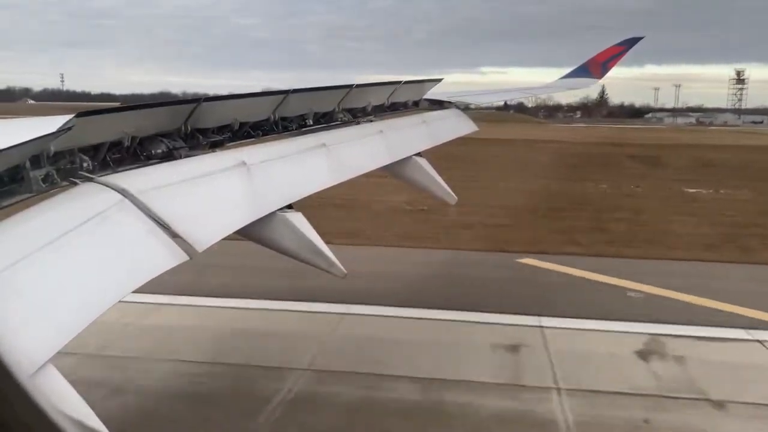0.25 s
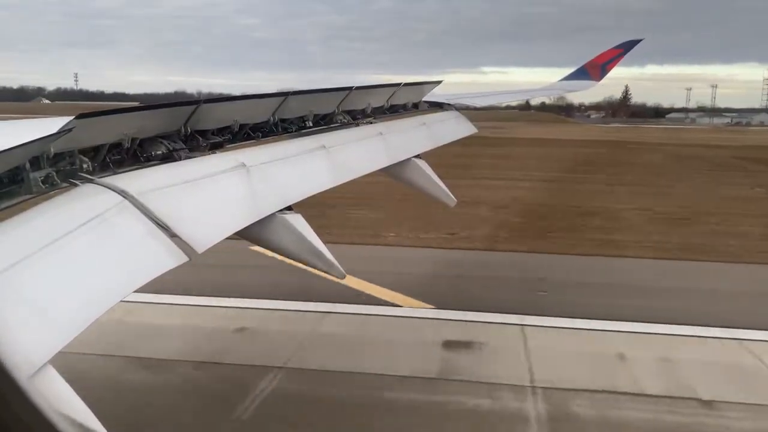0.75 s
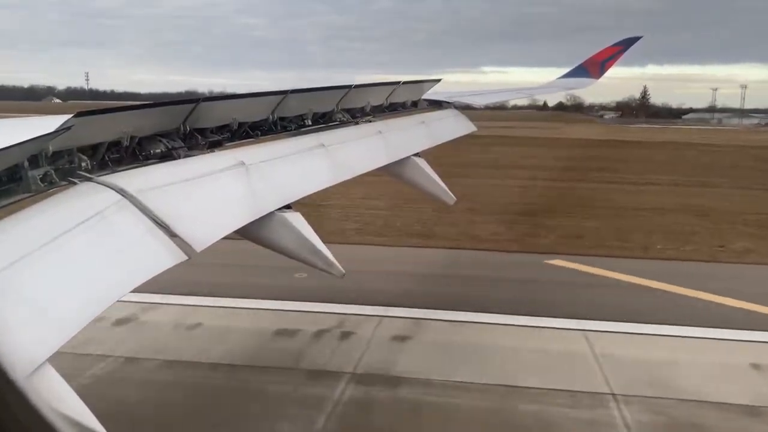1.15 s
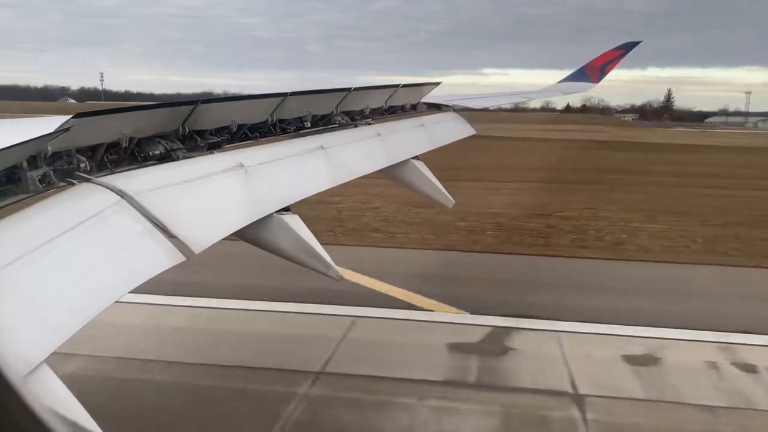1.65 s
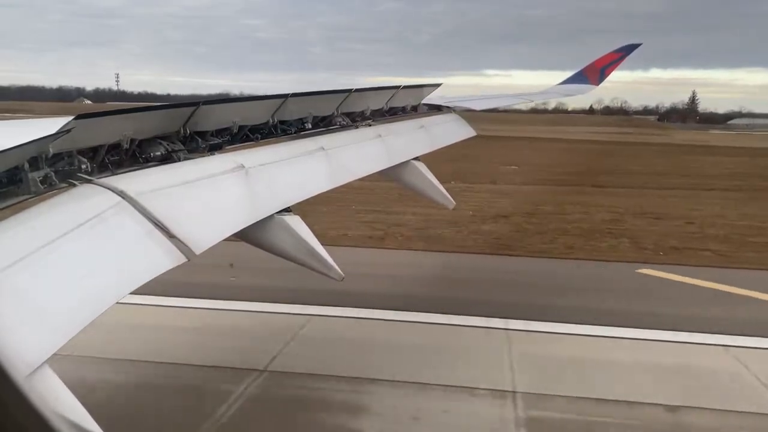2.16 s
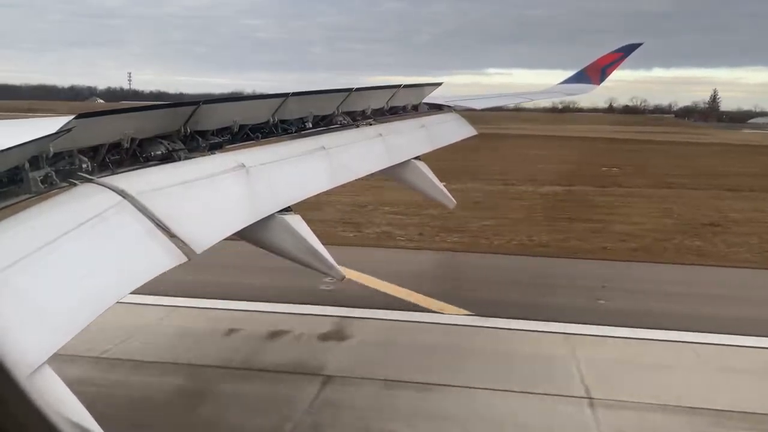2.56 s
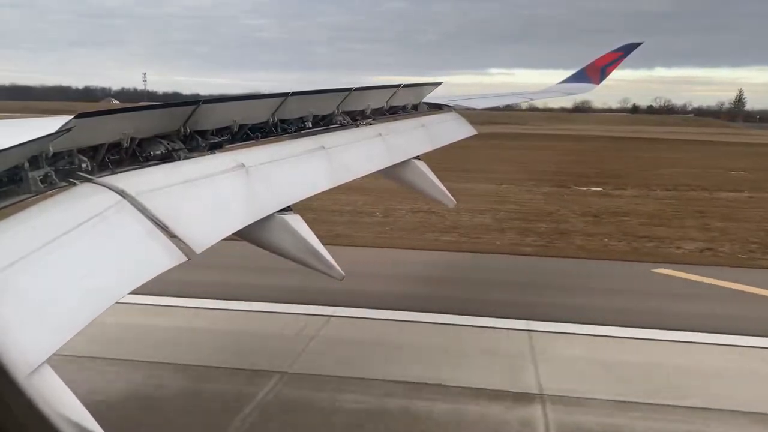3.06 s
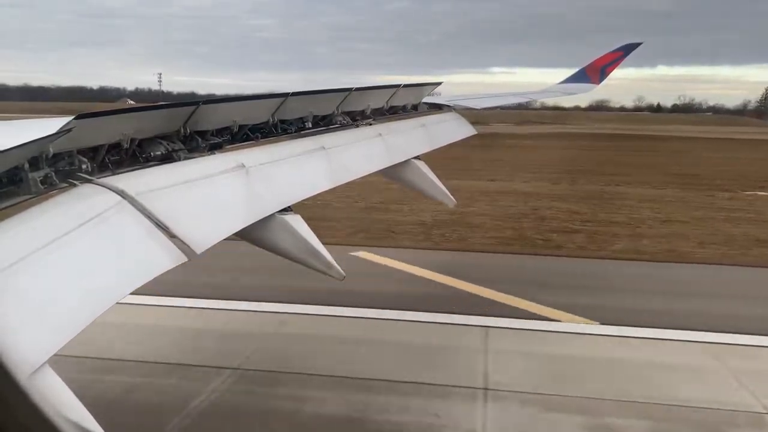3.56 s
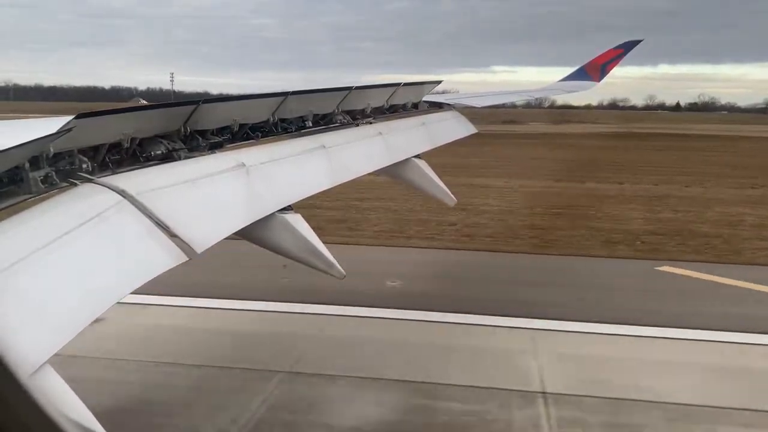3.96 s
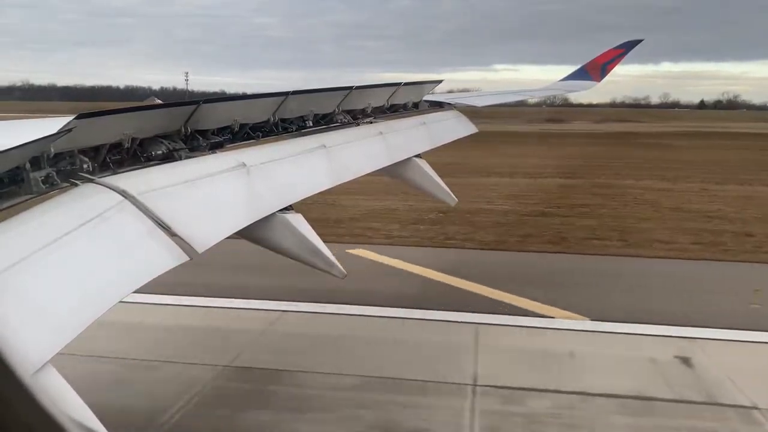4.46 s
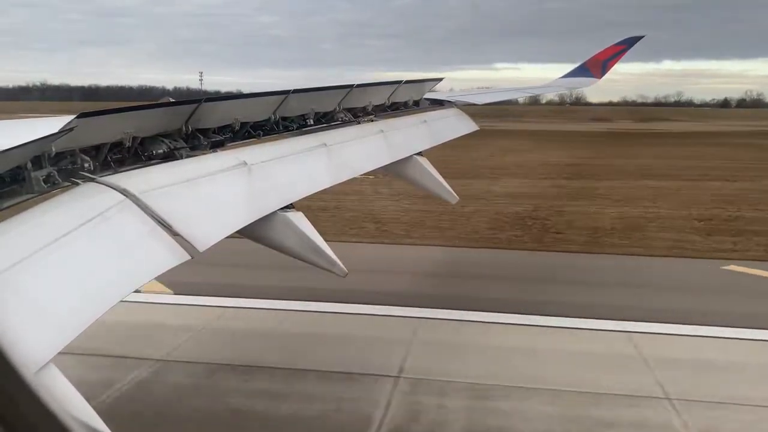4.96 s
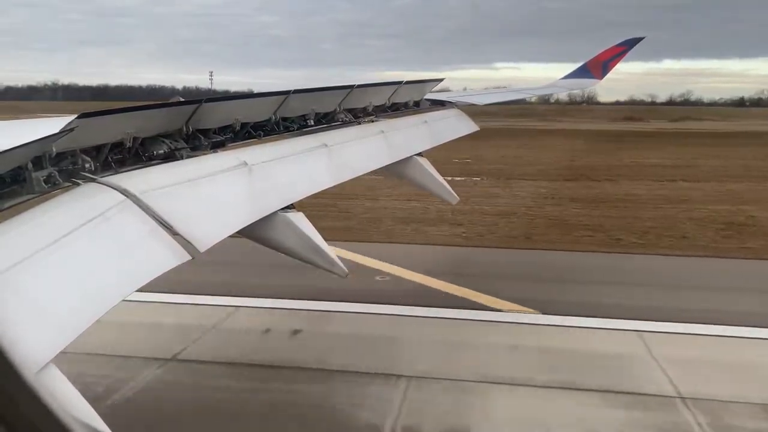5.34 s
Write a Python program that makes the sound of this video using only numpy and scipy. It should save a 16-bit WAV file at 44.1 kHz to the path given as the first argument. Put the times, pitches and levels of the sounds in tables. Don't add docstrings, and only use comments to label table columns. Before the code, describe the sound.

A loud, boomy roar through an aircraft wall drops off after a second and a half, while low wheel rumble continues unevenly underneath. Dry panel knocks come in a dense burst, then scattered raps, hollow latch ticks, tiny buckle clinks and thin plastic chirps. A lower squeak sounds near the end. Small, dry cabin, handheld stereo microphone at the seat.

```python
import sys
import numpy as np
from scipy import signal
from scipy.fft import rfft, irfft, next_fast_len
from scipy.io import wavfile
from scipy.ndimage import uniform_filter1d, map_coordinates

SR = 44100
rng = np.random.default_rng(int(sys.argv[2]) if len(sys.argv) > 2 else 0)


def gain_from_decibels(decibels):
    exponent = np.asarray(decibels, float) / 20
    return 10 ** exponent


def to_wav(sig):
    pcm = np.clip(np.atleast_2d(sig), -1, 1) * 32767
    pcm = np.round(pcm).astype(np.int16)
    wavfile.write(sys.argv[1], SR, pcm.T)


N = 246959


def unit(x):
    return x / np.sqrt(np.mean(x ** 2) + 1e-20)


def along(points, hz):
    f, v = np.transpose(points)
    return np.interp(np.log(hz + 1), np.log(f + 1), v)


def curves(rows):
    s, *cols = np.transpose(rows)
    return [np.interp(np.arange(N) / SR, s, c) for c in cols]


def wobble(rate_hz):
    knots = rng.standard_normal(int(N * rate_hz / SR) + 4)
    return map_coordinates(knots, [np.arange(N) * rate_hz / SR])


def filtered(x, response):
    n = x.shape[-1]
    m = next_fast_len(n + 8192)
    return irfft(rfft(x, m) * response(np.fft.rfftfreq(m, 1 / SR)), m)[..., :n]


def rush(spectrum, patchy_db):
    z = signal.stft(rng.standard_normal((2, N)), nperseg=512)[2]
    field = uniform_filter1d(rng.standard_normal(z.shape[1:]), size=6, axis=0)
    field = uniform_filter1d(field, size=12, axis=1)
    pair = signal.istft(z * gain_from_decibels(patchy_db * unit(field)), nperseg=512)[1][:, :N]
    return unit(filtered(pair, lambda hz: gain_from_decibels(along(spectrum, hz))))


def evened(x, share):
    envelope = np.abs(signal.hilbert(x[0], next_fast_len(N))[:N])
    swell = uniform_filter1d(envelope, size=900)
    return unit(x / (swell + 0.51) ** share)


def fuzzy(hz, width_hz, steady):
    phase = 2 * np.pi * np.cumsum(hz) / SR
    pair = []
    for clean in (steady, 0):
        in_phase = (clean + wobble(width_hz)) * np.cos(phase)
        pair.append(in_phase + wobble(width_hz) * np.sin(phase))
    return unit(np.array(pair))


def add(track, s, sound):
    part = track[round(s * SR):][:len(sound)]
    part += sound[:len(part)]


def scattered(x, wet_db, t60_s):
    t = np.arange(SR // 5) / SR
    tails = rng.standard_normal((2, len(t))) * gain_from_decibels(-60 * t / t60_s)
    wet = signal.fftconvolve(x[None], tails / np.linalg.norm(tails[0]), axes=1)[:, :N]
    return x * np.array([[1], [-.3]]) + gain_from_decibels(wet_db) * wet


def faint(db):
    count, spread_db = 90, 5.5
    rows = rng.random((count, 2))
    return [(u * N / SR, db + spread_db * (2 * v - 1)) for u, v in rows]


def shaking():
    # start_s, length_s, shaking_db, extra_for_clips_db
    patches = [(0.106, 0.6, 4, -2.5), (1.102, 0.029, 2, -0.5), (1.169, 0.029, -1, 12),
               (1.282, 0.054, 0.5, 3), (1.454, 0.055, 6, 4), (1.528, 0.016, 8.5, -10), (1.579, 0.024, 4, 1),
               (1.602, 0.27, 11.5, 1.5), (1.654, 0.34, 4.5, -2), (1.97, 0.18, 5.5, -1.5),
               (2.325, 0.038, 6.5, -1), (2.46, 0.11, 4, 1), (2.907, 0.043, 3, 0.5), (3.178, 0.11, -2, 6),
               (3.305, 0.1, -4, -1), (3.492, 0.02, 7, -0.5), (3.677, 0.16, 3.5, -0.5),
               (4.295, 0.068, 3, -1.5), (4.363, .035, 4.5, 3), (4.424, 0.093, 1.5, -0.5), (4.49, 0.1, 6, 0),
               (4.608, 0.12, 5.5, 0), (4.796, 0.032, 2.5, 0.5), (4.987, 0.022, 0, 1.5), (5.253, 0.13, 3, 0),
               (5.528, 0.019, 9, -0.5)]
    rise_s, fall_s = 0.0036, 0.023
    t = np.arange(N) / SR
    start_s, length_s, db, clip_db = np.transpose(patches)[:, :, None]
    rise = np.clip((t - start_s) / rise_s, 0, 1)
    on = rise * np.exp(-np.clip(t - start_s - length_s, 0, None) / fall_s)
    return (on * db).sum(axis=0), (on * (db + clip_db)).sum(axis=0)


def level(shake_db, idle_db, per_thrust, per_shake):
    # time_s, level_db
    thrust = [
        (0, -21.5),
        (.6, -23),
        (1.2, -23),
        (1.5, -27),
        (2.05, -28.5),
        (2.3, -30.5),
        (3, -32),
        (4, -33.5),
        (5.6, -34),
    ]
    thrust_over_idle_db = curves(thrust)[0] + 33
    return gain_from_decibels(idle_db + per_thrust * thrust_over_idle_db + per_shake * shake_db)


def engines():
    # time_s, level_db
    whine = [(1.2, -60), (1.7, -52), (2.15, -57), (2.28, -46.5), (2.7, -49), (2.9, -47), (3.35, -51),
             (3.6, -48), (4.24, -52), (4.31, -43.5), (4.47, -54), (4.57, -44.5), (4.82, -43), (5, -53),
             (5.26, -52), (5.38, -46), (5.55, -50)]
    # pitch_hz, level_db, width_hz, fade_end_s
    pumps = [
        (1254, -47.5, 24, 1.9),
        (1593, -58, 30, 1.7),
        (12000, -80.5, 260, 1.7),
    ]
    whine_from_s, whine_hz, sag_hz_per_s = 1.2, 940, 19
    waver_hz, break_db = 6, 1.2
    t = np.arange(N) / SR
    hz = whine_hz - sag_hz_per_s * (t - whine_from_s) + waver_hz * wobble(5)
    whine_gain = gain_from_decibels(curves(whine)[0] + break_db * wobble(9)) * (t > whine_from_s)
    sound = whine_gain * fuzzy(hz, 55, steady=1.9)
    for pump_hz, pump_db, width_hz, until_s in pumps:
        fade = np.clip((until_s - t) / 0.35, .25, 1)
        sound += gain_from_decibels(pump_db) * fade * fuzzy(np.full(N, pump_hz), width_hz, steady=0.27)
    return sound


def squeaks():
    # start_s, peak_db, start_hz, end_hz, length_s
    chirps = [(0.361, -53.5, 9200, 9800, .01), (0.368, -56.5, 11300, 11350, .014),
              (0.373, -53, 8550, 8950, 0.015), (0.515, -54.5, 8700, 11100, 0.018),
              (0.687, -48, 8570, 9340, 0.01), (0.695, -53, 10400, 10800, 0.018),
              (1.092, -62.5, 11400, 11660, 0.013), (1.32, -54, 10840, 11100, 0.015),
              (1.555, -55.5, 11300, 11200, 0.023), (2.224, -51, 11000, 8800, 0.0089),
              (2.232, -43, 9140, 8870, 0.0092), (2.524, -50, 9200, 11000, 0.0063),
              (2.531, -52.5, 8730, 8800, 0.0096), (2.698, -50.5, 8700, 10800, 0.01),
              (2.753, -53.5, 10740, 11200, .022), (2.956, -53, 9200, 11100, 0.012),
              (3.257, -60, 10100, 11000, 0.014), (3.493, -58, 11000, 11000, .012),
              (3.686, -55.5, 11100, 10850, 0.013), (3.904, -47, 3800, 3850, 0.035),
              (4.395, -59.5, 9000, 10800, .014), (4.816, -36, 1570, 1600, 0.06),
              (4.856, -39.5, 1590, 1585, 0.064), (5.423, -55, 9950, 11000, 0.013)]
    track = np.zeros(N)
    stumble_hz = 220 * wobble(900)
    for s, db, start_hz, end_hz, length_s in chirps:
        u = np.linspace(0, 1, int(np.clip(length_s, .004, .13) * SR))
        roughness = abs(end_hz - start_hz) / 900 + start_hz / 33000
        hz = start_hz + (end_hz - start_hz) * u + stumble_hz[round(s * SR):][:len(u)] * roughness
        chirp = np.sin(np.pi * u ** 0.44) * np.sin(2 * np.pi * np.cumsum(hz) / SR)
        add(track, s, gain_from_decibels(db - 4.0) * chirp)
        grain = 5 * uniform_filter1d(rng.standard_normal(len(u)), size=10)
        tick = grain * np.sin(2 * np.pi * 9600 * np.arange(len(u)) / SR)
        add(track, s, gain_from_decibels(db - 9 - 40 * u) * tick * (start_hz > 8000))
    return scattered(track * gain_from_decibels(3.5 * wobble(500)), wet_db=-3, t60_s=.045)


def rattles():
    # start_s, peak_db, ring_hz
    knocks = [(0.196, -34, 3430), (0.745, -26.5, 3220), (1.272, -30.5, 2530), (1.4524, -38, 3250),
              (1.4523, -35.5, 5070), (1.528, -31, 4380), (1.532, -27, 3150), (1.594, -24.5, 3260),
              (1.641, -22, 4300), (1.645, -28, 3980), (1.657, -36, 2400), (1.685, -29, 1630),
              (1.7, -33.5, 4400), (1.708, -28, 4950), (1.717, -31, 2450), (1.743, -27.5, 2450),
              (1.768, -28.5, 5060), (1.775, -28, 3220), (1.797, -20.5, 2500), (1.8084, -21.5, 4300),
              (1.81, -26.5, 5200), (1.867, -30, 4370), (1.873, -24, 2280), (2.03, -38, 2830),
              (2.183, -38.5, 3000), (2.292, -31, 3160), (2.3417, -34, 2850), (2.5084, -23, 2270),
              (2.5632, -24, 2500), (2.654, -32, 1890), (2.6873, -32, 3110), (2.931, -34, 2790),
              (3.219, -34, 900), (3.493, -30.5, 2580), (3.564, -34, 2500), (3.686, -30, 2410),
              (3.753, -25, 3320), (3.812, -33.5, 2880), (4.297, -30, 2550), (4.301, -33, 1000),
              (4.375, -35, 4380), (4.544, -30, 1840), (4.549, -36, 2600), (4.685, -30, 1060),
              (4.7, -32, 2250), (4.82, -32.5, 2250), (4.854, -45, 3000), (5.208, -30, 950),
              (5.26, -36.5, 2850), (5.2784, -29.5, 2900), (5.3297, -32.5, 2570), (5.399, -34, 3040),
              (5.43, -42.5, 5400), (5.486, -40, 3000), (5.528, -38.5, 2730), (5.546, -29, 2250)]
    # freq_hz, level_db
    panel = [(400, -57.5), (1200, -5), (2500, 10.5), (4000, 4), (5500, -3), (6500, -13), (9000, -21),
             (15500, -34.5)]
    # start_s, peak_db
    ticks = [(1.976, -25.5), (2.034, -37), (2.0789, -43), (2.1844, -41), (2.5062, -30), (2.544, -45),
             (2.685, -24), (2.8713, -26), (3.131, -45), (3.4617, -27.5), (3.5007, -29.5), (3.567, -32),
             (3.6349, -40), (3.685, -26), (3.939, -24), (4.007, -27.5), (4.1856, -59), (4.245, -24),
             (4.302, -32), (4.374, -27), (4.436, -44), (4.4947, -27.5), (4.526, -38), (4.551, -31),
             (4.62, -37), (4.6715, -27), (4.75, -26), (4.945, -41.5), (5.016, -36), (5.165, -40.5),
             (5.2155, -33), (5.26, -33.5), (5.332, -23), (5.3995, -25), (5.5384, -35)]
    # start_s, peak_db
    clinks = [(0.243, -52.5), (0.382, -61), (0.4942, -62), (0.687, -65), (0.732, -56), (0.8216, -59),
              (1.1955, -55.5), (1.2712, -57.5), (1.46, -61.5), (1.6075, -60.5), (1.741, -51), (1.7762, -48),
              (2.2174, -58.5), (2.288, -53), (2.4454, -56), (2.4833, -67), (2.5324, -71), (2.663, -61),
              (2.81, -60), (2.973, -63.5), (3.685, -58), (3.727, -62), (3.753, -56.5), (4.2992, -71),
              (4.3585, -60), (4.5284, -64), (4.9552, -69), (4.9951, -61), (5.3317, -52.5), (5.527, -58.5)]
    tick_hz, clink_hz = 1515, 8200
    crack_db, crack_t60_s, echo_db, echo_t60_s = -5, .003, -18, .035
    cracks, rings = np.zeros((N, 2)), np.zeros(N)
    t = np.arange(SR // 16) / SR
    for s, db, hz in knocks:
        dull_db = 8 * (hz < 1200)
        snap = gain_from_decibels(crack_db - 60 * t / crack_t60_s) * rng.standard_normal(len(t)) * np.array([[1], [-.3]])
        echo = gain_from_decibels(echo_db - 60 * t / echo_t60_s) * rng.standard_normal((2, len(t)))
        add(cracks, s, gain_from_decibels(db - dull_db) * (snap + echo).T)
        add(rings, s, gain_from_decibels(db + dull_db - 7.5 - 60 * t / .018) * np.sin(2 * np.pi * hz * t))
    for s, db in ticks + faint(-44):
        dying = gain_from_decibels(-60 * t / .022) * (1 - np.exp(-t / .0015))
        add(rings, s, gain_from_decibels(db + 4) * dying * np.sin(2 * np.pi * tick_hz * rng.normal(1, .008) * t))
    for s, db in clinks + faint(-68.5):
        hz = clink_hz * rng.normal(1, .008)
        add(rings, s, gain_from_decibels(db + 5.5 - 60 * t / 0.012) * np.sin(2 * np.pi * hz * t))
    for s, db in faint(-43) + faint(-43):
        hz = rng.uniform(2000, 4000)
        add(rings, s, gain_from_decibels(db - 60 * t / .02) * np.sin(2 * np.pi * hz * t))
    cracks = filtered(cracks.T, lambda hz: gain_from_decibels(along(panel, hz)))
    return cracks + scattered(rings, wet_db=-9, t60_s=.05)


def trim():
    # freq_hz, level_db_per_hz
    chatter = [(200, -120), (500, -31), (900, 2.5), (1500, -1), (2500, -4.5), (4300, -12), (5500, -14),
               (6200, -25.5), (9000, -120)]
    # freq_hz, level_db_per_hz
    buzz = [(3000, -120), (5500, -10.5), (6500, 1.5), (7500, -4.5), (8300, -2), (9300, -7.5),
            (11000, -13.5), (15500, -18)]
    panel_db, clip_db = shaking()
    contacts = gain_from_decibels(2.6 * wobble(260) + .7 * wobble(60))
    crackle = gain_from_decibels((.6 + .035 * panel_db) * wobble(70))
    panels = unit(contacts * rush(chatter, patchy_db=0.3))
    clips = unit(contacts * rush(buzz, patchy_db=-1.0))
    panels *= level(panel_db, idle_db=-51, per_thrust=0.092, per_shake=0.88)
    clips *= level(clip_db, idle_db=-67.5, per_thrust=0.15, per_shake=0.9)
    return crackle * (panels + clips)


def jolt():
    peak_db, hz, t60_s = -3, 105, .05
    t = np.arange(N) / SR
    return -gain_from_decibels(peak_db - 60 * t / t60_s) * np.cos(2 * np.pi * hz * t) * np.array([[1], [0]])


def rollout():
    # freq_hz, level_db_per_hz
    tyre_spectrum = [(5, -61.5), (22, -6.5), (40, 2.5), (60, 9.5), (82, 10), (105, 7.5), (140, -14),
                     (220, -64.5), (500, -120)]
    boom_spectrum = [(25, -120), (60, -47.5), (90, -9.5), (120, 2), (150, -2), (180, -6.5), (210, -6.5),
                     (250, -31), (330, -49.5), (700, -120)]
    wall_spectrum = [(60, -120), (150, -34.5), (230, -3), (290, 1), (330, -3.5), (380, -0.5), (450, -11),
                     (550, -15.5), (750, -16.5), (1100, -49.5), (2500, -120)]
    upper_spectrum = [(200, -120), (500, -22.5), (750, 0), (950, 0.5), (1150, -4), (1400, -7), (1600, -3.5),
                      (1900, -13), (2600, -66), (6000, -120)]
    hiss_spectrum = [(500, -120), (1300, -24), (2000, 11), (3000, 8.5), (3700, 2), (4000, -12),
                     (5600, -9.5), (6100, -18), (7500, -19.5), (8300, -35), (9300, -28.5), (12000, -28),
                     (15500, -42)]
    # time_s, tyre_swell_db, boom_swell_db
    surges = [(.05, 5.5, -5), (.15, 3.5, 1), (.55, 3.5, 1), (.77, -2, -0.5), (1.08, 1.5, 0), (1.32, 1, 3.5),
              (1.53, -1, 3), (1.649, 5, 2), (1.75, 5, -1.5), (1.971, 2, 6), (2.129, 5, 3.5), (2.33, 1, 4.5),
              (2.69, 2.5, 2), (3.04, 3.5, -1), (3.82, 0, -0.5), (3.99, 0, -1), (4.13, -4, 2.5),
              (4.231, 4.5, 3), (5.11, 4, -3), (5.31, 3.5, -4), (5.569, 3.5, 0.5)]
    half_width_s = 0.044
    s, *swells = np.transpose(surges)
    passing = np.exp(-((np.arange(N) / SR - s[:, None]) / half_width_s) ** 2)
    tyre_db, boom_db = np.array(swells) @ passing
    shake_db = shaking()[0]
    bumps_db = wobble(12)
    tyres = gain_from_decibels(tyre_db) * evened(rush(tyre_spectrum, patchy_db=-2.5), share=0.87)
    boom = gain_from_decibels(boom_db) * evened(rush(boom_spectrum, patchy_db=0.5), share=0.048)
    wall = gain_from_decibels(0.67 * bumps_db) * rush(wall_spectrum, patchy_db=-1.2)
    upper = gain_from_decibels(0.29 * bumps_db) * rush(upper_spectrum, patchy_db=1.6)
    hiss = gain_from_decibels(bumps_db) * rush(hiss_spectrum, patchy_db=1.5)
    tyres *= level(shake_db, idle_db=-20.5, per_thrust=0.3, per_shake=0)
    boom *= level(shake_db, idle_db=-26.5, per_thrust=1.19, per_shake=0)
    wall *= level(shake_db, idle_db=-35, per_thrust=1.256, per_shake=0.023)
    upper *= level(shake_db, idle_db=-45, per_thrust=1, per_shake=0.3)
    hiss *= level(shake_db, idle_db=-55, per_thrust=0.75, per_shake=0.34)
    return tyres + boom + wall + upper + hiss


def scene():
    return engines() + squeaks() + rattles() + trim() + jolt() + rollout()


def two_ports(dry):
    # freq_hz, likeness
    alike = [(60, .99), (130, .97), (250, .87), (400, .88), (620, .15), (950, .65), (1350, .5), (1650, .68),
             (2100, .2), (9500, .25), (11300, 1)]
    # freq_hz, left_minus_right_db
    shade = [(60, -.7), (450, -2.5), (750, 2.5), (1450, -5), (2000, -.5), (2650, 0), (3700, -11),
             (5500, -13), (6100, -4.5), (7200, -5), (8400, -10.5), (9200, -5), (11300, 0)]
    # freq_hz, left_lead_rad
    lead = [(20, 0), (75, .11), (150, 0), (215, -.25), (390, .32), (520, 1), (650, -.8), (780, -.5),
            (950, .14), (1120, 1.15), (1290, 1.5), (1500, 3.1), (1750, 2.7), (9000, 0)]

    def split(hz):
        angle = np.arccos(np.clip(along(alike, hz), 0, 1)) / 2
        return np.array([np.cos(angle), np.sin(angle)])

    def tilt(hz):
        half = gain_from_decibels(along(shade, hz) / 2) * np.exp(.5j * along(lead, hz))
        return np.array([half, 1 / half])

    shared, diffuse = filtered(dry, split)
    return filtered(np.array([shared + diffuse, shared - diffuse]), tilt)


def roll_off(x):
    return signal.sosfilt(signal.butter(12, 15690, fs=SR, output="sos"), x)


def record(dry):
    running, edge_s, ceiling = 2048, .00011, .98
    padded = np.pad(dry, ((0, 0), (running, running)), mode="reflect")
    ports = two_ports(padded)[:, running:-running]
    edge = np.sin(np.pi / 2 * np.clip(np.arange(N) / (edge_s * SR), 0, 1)) ** 2
    ports = ports * edge * edge[::-1]
    held = ports / (1 + np.abs(ports / ceiling) ** 5) ** (1 / 5)
    return roll_off(held)


dry = scene()
out = record(dry)
to_wav(out)
```